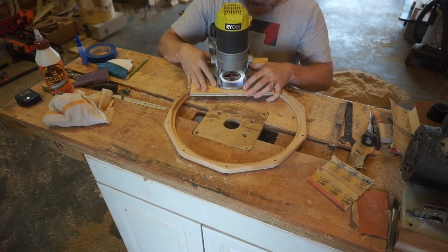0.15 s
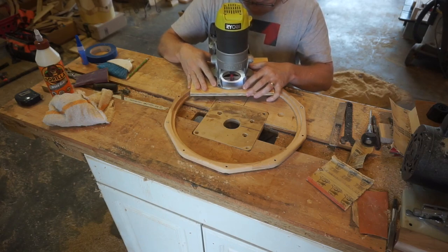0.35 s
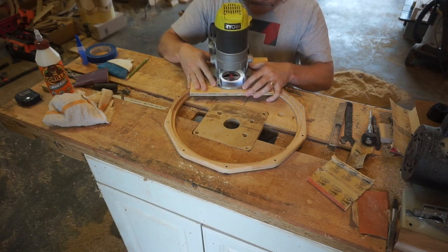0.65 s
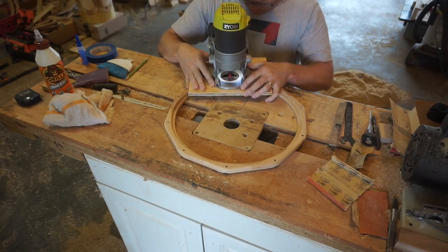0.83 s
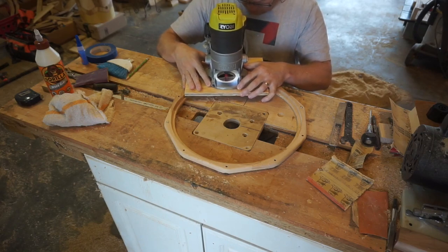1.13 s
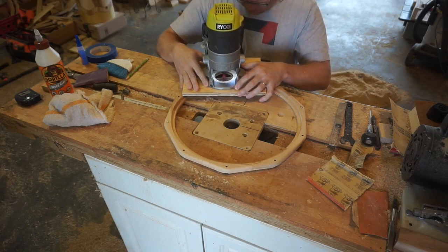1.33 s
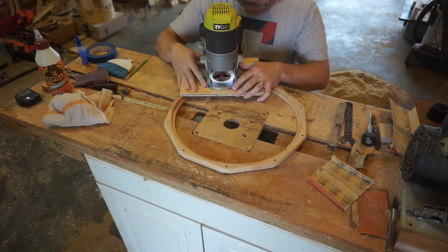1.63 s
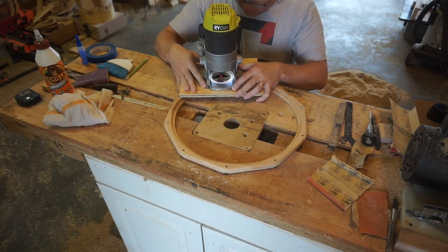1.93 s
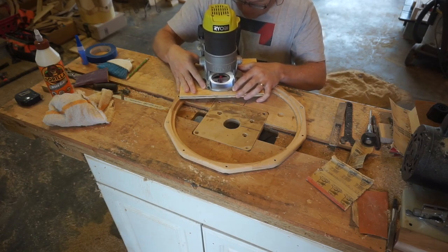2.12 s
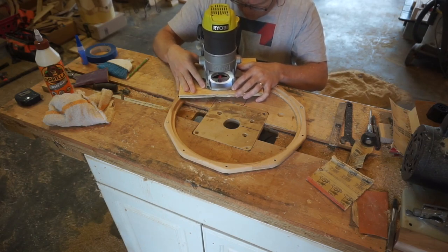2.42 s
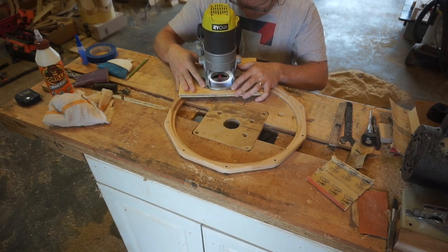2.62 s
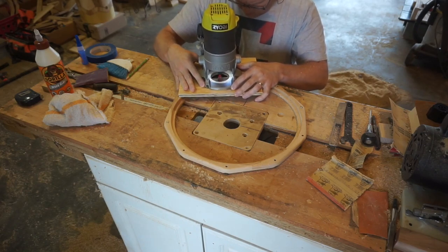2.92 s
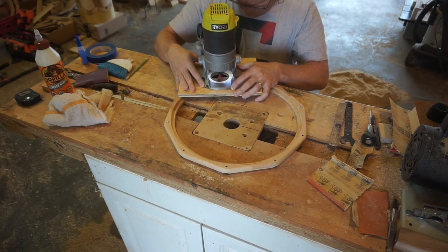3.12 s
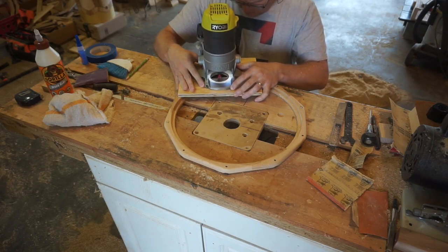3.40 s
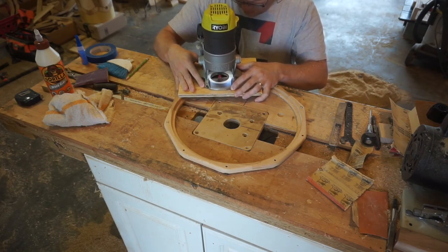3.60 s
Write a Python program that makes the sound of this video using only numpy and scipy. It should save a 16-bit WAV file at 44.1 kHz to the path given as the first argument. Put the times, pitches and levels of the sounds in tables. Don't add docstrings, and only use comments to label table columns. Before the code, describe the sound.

A handheld electric router runs flat out from 0 to 3.75 seconds, never starting or stopping. Its bright, buzzing stack of high tones dips slightly until about 1.2, climbs to a higher pitch by 2.0, then wavers and roughens from 2.8 to 3.6 before recovering. Steady airy roar and fine hiss surround it, with short bench reflections. Low draught thuds and flapping at the microphones gradually fade.

```python
import sys
import numpy as np
from scipy import signal
from scipy.fft import rfft, irfft, next_fast_len
from scipy.io import wavfile
from scipy.ndimage import uniform_filter1d, map_coordinates

SR = 44100
rng = np.random.default_rng(int(sys.argv[2]) if len(sys.argv) > 2 else 0)


def log_audio(samples):
    frames = np.atleast_2d(samples).T
    limited = np.clip(frames, -1, 1)
    pcm = np.round(limited * 32767).astype(np.int16)
    wavfile.write(sys.argv[1], SR, pcm)


def voltage_ratio(level):
    return 10 ** (np.asarray(level, float) / 20)


N = 165375
LEFT_RIGHT = np.array([[.5], [-.5]])

# time in seconds, whine pitch in Hz.
SPEED = [(0, 1721), (.3, 1716), (.52, 1718.5), (.8, 1715), (.92, 1711), (1.08, 1711), (1.22, 1706.5),
         (1.36, 1712), (1.52, 1712), (2.02, 1745.5), (2.25, 1747.5), (2.72, 1746), (2.87, 1722.5),
         (2.99, 1734), (3.36, 1699.5), (3.52, 1727), (3.63, 1739), (3.75, 1741.5)]
# time in seconds, fundamental in dB, bite of the bit in dB,
# share of the shell left free to ring 0-1, edge of the cut in dB per multiple.
LOAD = [(0, -42, -47, 0.9, -2), (.45, -48.5, -28, 0, -9), (.7, -44, -31, 0.93, 2.5),
        (.95, -41.5, -32, 1, 0.3), (1.2, -39.5, -27.5, 0.9, 0.1), (1.6, -37.5, -28.5, 0.92, -0.9),
        (1.84, -41, -30.5, 1, 1), (1.92, -36, -53, 0.5, 4.5), (2.3, -37, -38.5, 0.2, 3.5),
        (2.75, -37.5, -44, .4, 4.5), (2.82, -41, -26.5, 0.2, 1.5), (2.95, -41, -33.5, 0.8, 3.5),
        (3.05, -43, -29.5, 0.6, 2.1), (3.34, -41, -27, 1, 0.5), (3.4, -39.5, -37, 0.6, 4),
        (3.52, -45, -32, 0.8, -1), (3.65, -37, -41, .4, 4), (3.75, -38, -50, .4, -5)]
# multiple of the pitch, running free left and right in dB, cutting left and right in dB.
TONES = [(1, 0, 0, -30, -30), (2, -3, -12, 2, -6), (3, 4, -2, -16, -24), (4, -9, -10, -4, -8),
         (5, -12, 1, -17, -11), (6, -14, -10, -23, -19), (7, -23, -18, -22, -21), (8, -21, -21, -26, -25),
         (9, -22, -22, -21, -20)]
# centre in Hz, width
# in Hz, left dB, right dB.
SHELL = [(5150, 100, 10, -9)]
# centre in Hz, width in Hz, left dB, right dB.
CAP = [(3494, 30, 7, 0), (5242, 50, 1, 9), (8655, 70, 16, 6), (8737, 50, 0, 3), (11965, 90, 11, 12)]
# middle in
# seconds, length in seconds, multiple, left dB, right dB.
TONE_SWELLS = [(0.25, 0.9, 7.0, 8.0, 8.0), (0.34, 0.9, 3.0, -4.0, 6.0), (0.37, 0.26, 3.0, 4.0, -4.0),
               (0.43, 0.9, 2.0, -6.0, -12.0), (0.58, 0.9, 9.0, -16.0, -16.0), (0.79, 0.6, 5.0, -6.0, -4.0),
               (0.79, 0.9, 4.0, -4.0, -4.0), (0.94, 0.18, 7.0, 6.0, 0.0), (1.09, 0.9, 6.0, 0.0, -8.0),
               (1.21, 0.08, 7.0, 6.0, 4.0), (1.48, 0.26, 5.0, -16.0, -2.0), (1.54, 0.4, 7.0, -8.0, 4.0),
               (1.54, 0.4, 9.0, 8.0, 8.0), (1.6, 0.18, 4.0, 0.0, -10.0), (1.69, 0.12, 5.0, 4.0, 2.0),
               (1.93, 0.18, 5.0, 4.0, 2.0), (1.96, 0.26, 4.0, 4.0, 6.0), (2.14, 0.9, 3.0, -2.0, -2.0),
               (2.23, 0.9, 6.0, -16.0, 0.0), (2.44, 0.6, 2.0, -2.0, -12.0), (2.56, 0.9, 8.0, -16.0, -16.0),
               (2.59, 0.9, 9.0, -6.0, -6.0), (2.74, 0.9, 5.0, -2.0, 2.0), (2.8, 0.6, 4.0, 0.0, 4.0),
               (3.01, 0.26, 6.0, -6.0, -6.0), (3.07, 0.12, 7.0, 6.0, 4.0), (3.16, 0.12, 5.0, -6.0, -2.0),
               (3.19, 0.18, 8.0, 6.0, 6.0), (3.25, 0.08, 4.0, -12.0, 0.0), (3.25, 0.26, 3.0, 0.0, 8.0),
               (3.25, 0.4, 9.0, 0.0, 4.0), (3.28, 0.9, 3.0, -4.0, -2.0), (3.31, 0.26, 7.0, -2.0, -8.0),
               (3.37, 0.12, 4.0, 4.0, 10.0), (3.37, 0.18, 5.0, 10.0, 2.0), (3.61, 0.9, 6.0, 2.0, 4.0),
               (3.64, 0.18, 4.0, 4.0, 6.0), (3.73, 0.26, 5.0, 8.0, 4.0),
               (2.95, .07, 7, -12, -12),
    (2.94, .07, 9, -10, -10),
    (3.15, .05, 7, -10, -6),
    (3.23, .05, 9, -9, -9),
    (3.5, .1, 8, 4, 8),
    (.72, .28, 7, -9, -5),
    (3.02, .14, 3, -8, -4),
    (1.3, .3, 5, 3, 2),
]
TONE_LEAD_RAD = [0, .1, .3, -2.45, -1.95, -1.8, -1.8, 0, 0]
# middle in seconds, length in seconds, multiple, turn in radians.
TURNS = [
    (.25, .8, 5, -1.9),
    (.3, .7, 3, -2.1),
    (1.15, .5, 5, -1),
    (1.2, .45, 7, 1.3),
    (2.35, .9, 3, 1.6),
    (3.0, .5, 4, .4),
    (3.25, .3, 7, 1),
    (3.25, .3, 9, -2.2),
    (3.35, .15, 4, -.8),
    (3.55, .5, 5, -.6),
]
# frequency in Hz, level in dB per Hz.
ROAR = [(530, -34), (900, -27.5), (1590, -14), (1680, -11), (2390, -3.5), (3220, -4.5), (4170, -0.5),
        (5310, -3.5), (6600, -12.5), (8580, -61), (14500, -120)]
# frequency in Hz, level in dB per Hz.
FIZZ = [(5600, -51), (6400, -3), (7450, 5.5), (8200, -2), (10200, -1), (13200, -7), (15200, -2),
        (16000, -6.5)]
# centre in Hz, width in Hz, left dB, right dB.
HOUSING = [(1992, 50, 6, 5), (2320, 55, 5, 5), (2450, 70, 5, 4), (2790, 45, 4, 3), (2970, 60, 3, 2),
           (3430, 60, 3, 3), (3695, 60, 8, 4), (3845, 55, 5, 3), (4100, 220, 4, 4), (4560, 40, 4, 5),
           (4718, 60, 9, 6), (5150, 70, 5, 5), (5370, 50, 6, 2), (5525, 60, 4, 1)]
# delay in ms, left gain, right gain.
BENCH = [(1.16, 0.091, -0.14), (1.76, 0.027, -0.19), (2.22, -0.013, 0.0026), (2.33, -0.011, 0.061),
         (2.9, 0.016, -0.12), (4.7, 0.22, -0.14), (6.0, 0.19, -0.018)]
# time in seconds, level in dB.
AIR_FLOW = [(0, 1.15), (1, 0.03), (2, 0), (3, -1), (3.75, 0.5)]
# time in seconds, lean to the left in dB.
LEAN = [(0, -0.6), (1.4, -1), (2.4, 0), (3.75, -0.6)]
# frequency in Hz, left over right in dB.
PORT_DB = [(1800, 0), (2500, 5.5), (3600, 5.5), (4700, 1.5), (5300, 6), (6100, 14), (6500, 0), (10500, -3),
           (13000, -0.5)]
# frequency in Hz, lead of the left in radians.
PORT_RAD = [(1800, 0), (2700, -0.1), (3700, 0.96), (4300, -0.55), (5000, 4), (7000, 4), (11000, 5.5),
            (13500, 7)]
# frequency in Hz, likeness 0-1.
PORT_ALIKE = [(1800, 1), (3000, 0.9), (4200, 0.85), (5700, 0.65), (7200, 0.83), (8100, 0.3), (13300, 0.15),
              (15600, 0.74)]
# time in seconds, strength in dB, turbulence in dB.
DRAUGHT = [(0.0, -19, 4.5), (0.11, -24, 1), (0.24, -21, 3), (0.5, -24, 0.5), (0.52, -19.5, -0.5),
           (0.6, -22.5, 1.5), (1.5, -22, 0.0), (1.62, -25.5, -0.5), (1.65, -19.5, 2), (1.99, -25.5, 2),
           (2.99, -26.5, -1), (3.02, -29.5, -1), (3.13, -26, -1), (3.17, -34, -6), (3.24, -25, -2.5),
           (3.4, -30, -4.5), (3.48, -26.5, -5.5), (3.75, -31, -4.5)]
# frequency in Hz, level in dB per Hz.
THUD = [(8.8, -56), (15, -22), (37, -3), (54, 7), (67, -7), (86, -8.5), (129, -10.5), (170, -26),
        (220, -51), (370, -120)]
# frequency in Hz, level in dB per Hz.
FLAP = [(82, -10), (140, -7), (182, -7), (254, -8.5), (352, -13), (1300, -25.5), (1690, -42), (2860, -120)]


def unit(x):
    return x / np.sqrt(np.mean(x ** 2) + 1e-20)


def along(points, hz):
    f, v = np.transpose(points)
    return np.interp(np.log(hz + 1), np.log(f + 1), v)


def curves(rows):
    s, *cols = np.transpose(rows)
    return [np.interp(np.arange(N) / SR, s, c) for c in cols]


def wobble(rate):
    return map_coordinates(rng.standard_normal(400), [np.arange(N) * rate / SR])


def filtered(x, response):
    m = next_fast_len(N + SR // 4)
    return irfft(rfft(x, m) * response(np.fft.rfftfreq(m, 1 / SR)), m)[..., :N]


def bell(hz, centre_hz, width_hz):
    return 1 / (1 + (2 * (hz - centre_hz) / width_hz) ** 2)


def resonances(modes, hz):
    return sum(np.c_[db] * bell(hz, centre, width) for centre, width, *db in modes)


def spells(events, multiple):
    t = np.arange(N) / SR
    total = np.zeros((1, N))
    for middle, length, which, *change in events:
        if which == multiple:
            total = total + np.c_[change] * np.exp(-(2 * (t - middle) / length) ** 4)
    return total


def whine():
    (pitch,) = curves(SPEED)
    fundamental_db, bite_db, ringing, edge_db = curves(LOAD)
    pitch = uniform_filter1d(pitch, size=1800) * (1 + .00012 * wobble(25.4))
    phase = 2 * np.pi * np.cumsum(pitch) / SR
    out = np.zeros((2, N))
    for k, *db in TONES:
        k = round(k)
        free_db = fundamental_db if k == 1 else -37
        cut_db = bite_db + (k - 2) * (edge_db + .06 * (bite_db - bite_db.max()))
        size = np.hypot(voltage_ratio(free_db + np.c_[db[:2]]), voltage_ratio(cut_db + np.c_[db[2:]]))
        ring_db = np.clip(ringing, 0, 1) * resonances(SHELL, k * pitch) + resonances(CAP, k * pitch)
        shared, *own = (wobble(9) for _ in range(3))
        flutter_db = .55 * (k / 4) ** .8 * (shared + .7 * np.array(own))
        handling_db = spells(TONE_SWELLS, k)
        lead = (TONE_LEAD_RAD[k - 1] + spells(TURNS, k)) * LEFT_RIGHT
        tone = np.sin(k * phase + lead + k * k)
        out += np.sqrt(2) * size * voltage_ratio(ring_db + flutter_db + handling_db) * tone
    return out


def patchy(depth_db):
    z = signal.stft(rng.standard_normal((2, N)), nperseg=512)[2]
    field = rng.standard_normal(z.shape[1:])
    field = uniform_filter1d(field, size=6, axis=0)
    field = uniform_filter1d(field, size=14, axis=1)
    return signal.istft(z * voltage_ratio(depth_db * unit(field)), nperseg=512)[1][:, :N]


def ports(pair):
    def blend(hz):
        turn = np.arccos(np.clip(along(PORT_ALIKE, hz), 0, 1)) / 2
        return np.array([np.cos(turn), np.sin(turn)])

    def offset(hz):
        return voltage_ratio(LEFT_RIGHT * along(PORT_DB, hz)) * np.exp(1j * LEFT_RIGHT * along(PORT_RAD, hz))

    mid, side = filtered(pair, blend)
    return filtered(np.array([mid + side, mid - side]), offset)


def housing_and_bench(hz):
    bench = 1 + sum(np.c_[gain] * np.exp(-2j * np.pi * hz * ms / 1000) for ms, *gain in BENCH)
    return voltage_ratio(resonances(HOUSING, hz)) * bench


def shop(x):
    t = np.arange(SR // 20) / SR
    decay = voltage_ratio(-60 * t / .06)
    tail = rng.standard_normal((2, len(t))) * decay * (t > .003)
    tail = tail * (rng.random(len(t)) < .5)
    tail = tail / np.linalg.norm(tail, axis=1, keepdims=True)
    return x + voltage_ratio(-13) * signal.fftconvolve(x, tail, axes=1)[:, :N]


def air():
    roar = voltage_ratio(-24.5) * unit(filtered(patchy(depth_db=0.24), lambda hz: voltage_ratio(along(ROAR, hz))))
    fizz = voltage_ratio(-29.5) * unit(filtered(patchy(depth_db=1.5), lambda hz: voltage_ratio(along(FIZZ, hz))))
    heard = shop(filtered(ports(roar + fizz), housing_and_bench))
    (flow_db,), (lean_db,) = curves(AIR_FLOW), curves(LEAN)
    return heard * voltage_ratio(flow_db + 0.45 * wobble(7.6) + lean_db * LEFT_RIGHT)


def draught():
    strength_db, eddy_db = curves(DRAUGHT)
    thud = unit(filtered(rng.standard_normal((2, N)), lambda hz: voltage_ratio(along(THUD, hz))))
    power = np.abs(uniform_filter1d(thud ** 2, size=1800))
    steadied = .3
    thud = unit(thud / (.1 + power) ** (steadied / 2))
    flap = unit(filtered(patchy(depth_db=1.2), lambda hz: voltage_ratio(along(FLAP, hz))))
    flap = unit(flap + .14 * flap.sum(axis=0))
    flap = flap * voltage_ratio(-1.7 * LEFT_RIGHT)
    flap_db = strength_db.mean() - 11 + eddy_db - 2.5 * np.arange(N) / SR
    return voltage_ratio(strength_db + 3.5) * thud + voltage_ratio(flap_db) * flap


def scene():
    return whine() + air() + draught()


def top_cut(x):
    return signal.sosfilt(signal.butter(12, 15760, fs=SR, output="sos"), x)


def record(dry):
    heard = filtered(dry, lambda hz: hz < 15735)
    return top_cut(heard)


dry = scene()
out = record(dry)
log_audio(out)
```